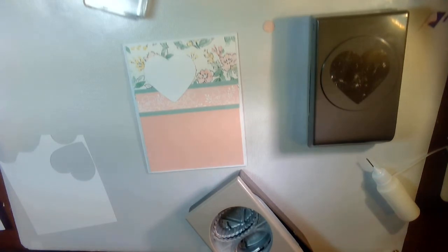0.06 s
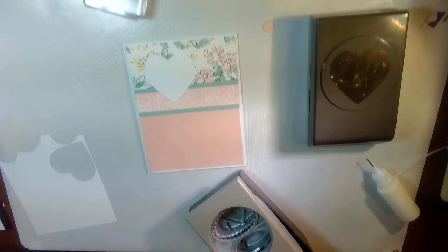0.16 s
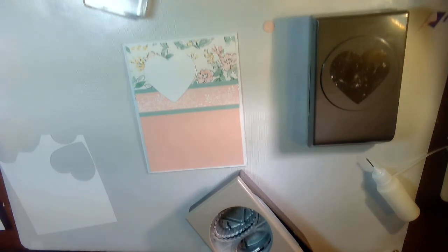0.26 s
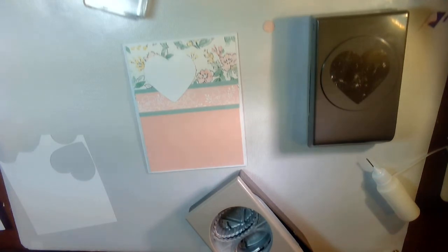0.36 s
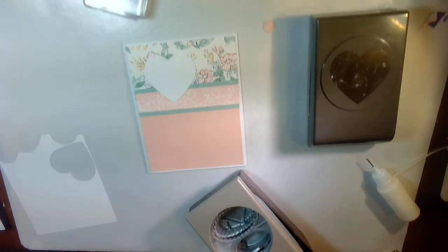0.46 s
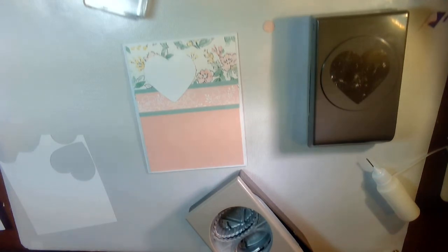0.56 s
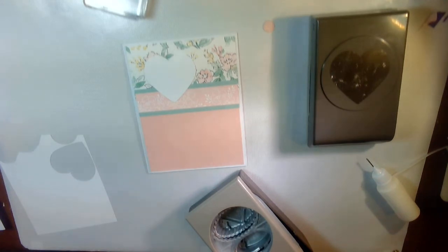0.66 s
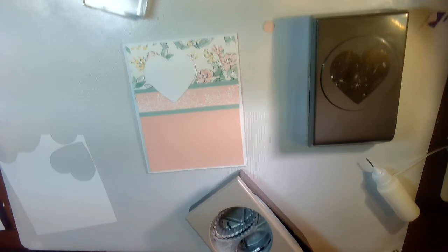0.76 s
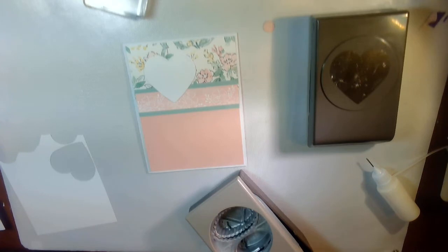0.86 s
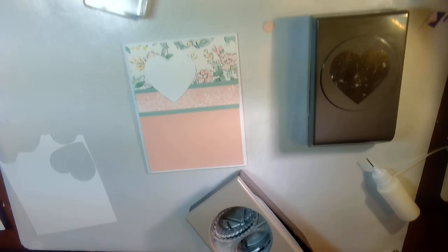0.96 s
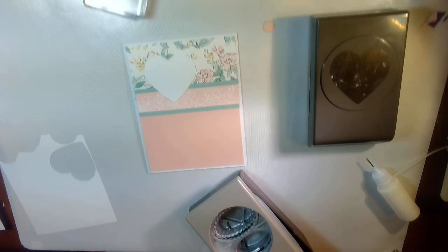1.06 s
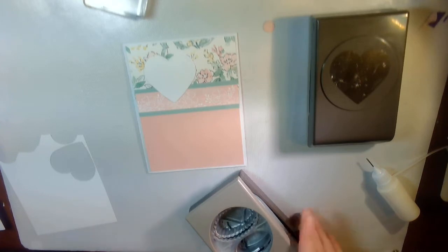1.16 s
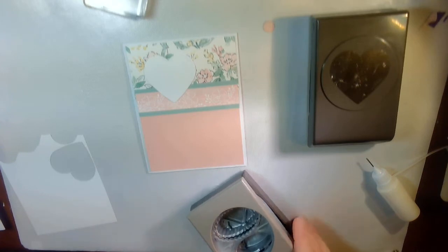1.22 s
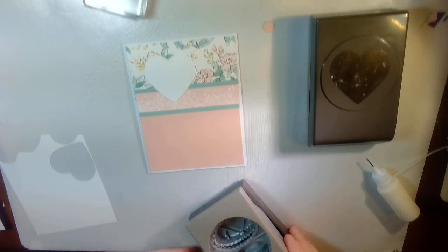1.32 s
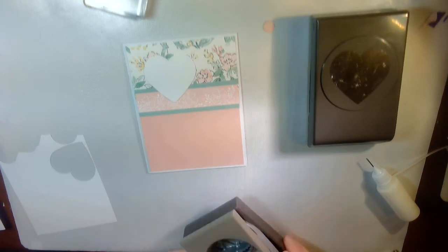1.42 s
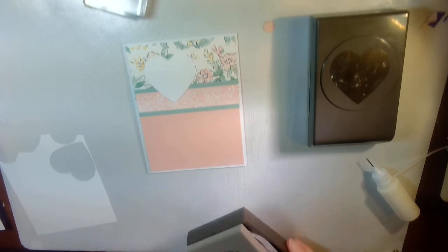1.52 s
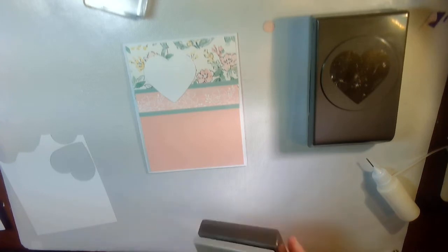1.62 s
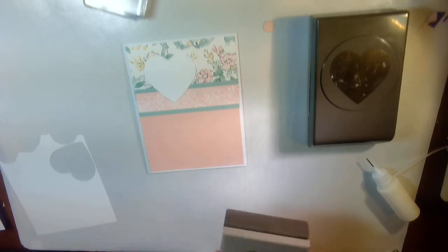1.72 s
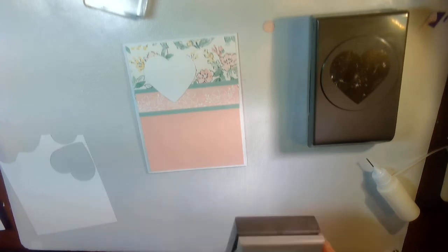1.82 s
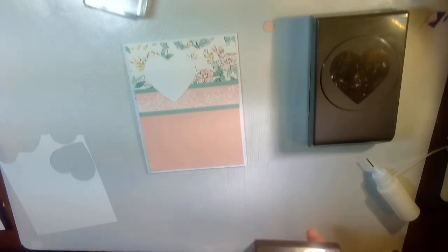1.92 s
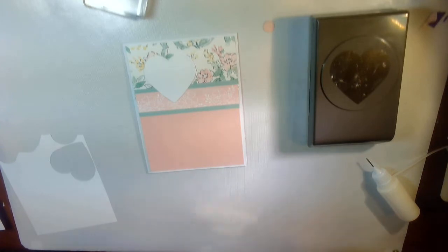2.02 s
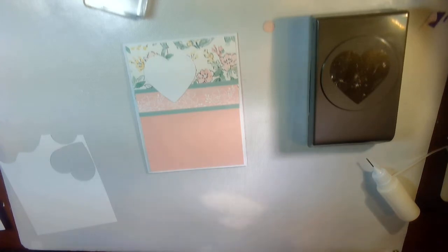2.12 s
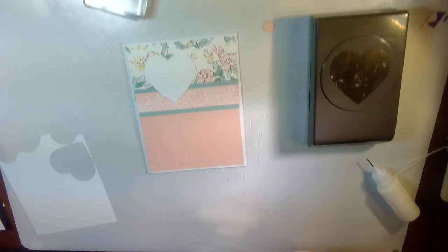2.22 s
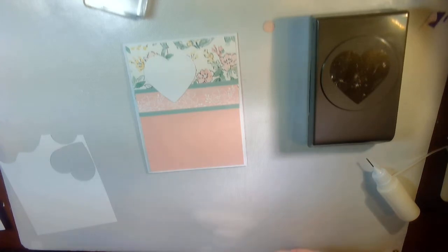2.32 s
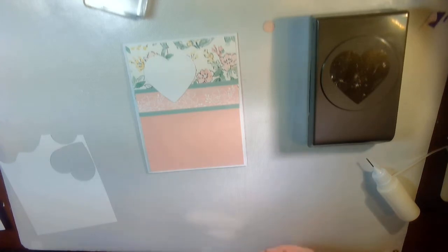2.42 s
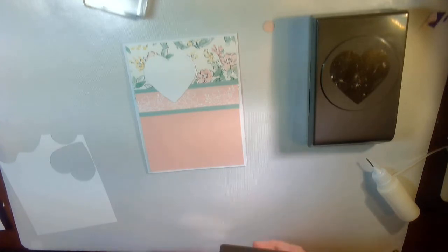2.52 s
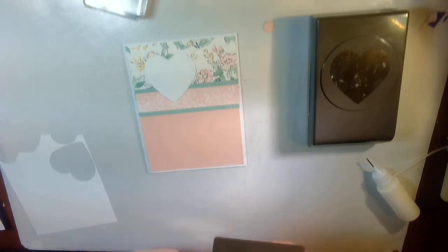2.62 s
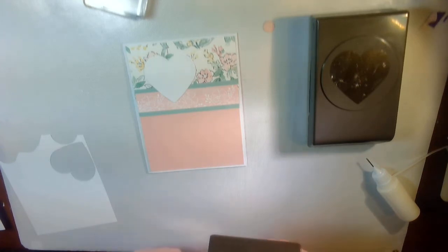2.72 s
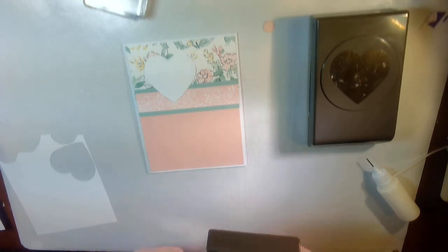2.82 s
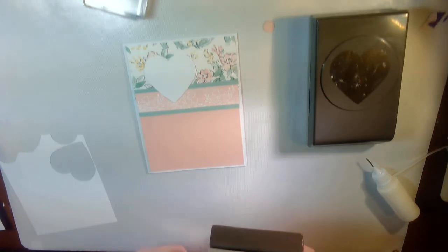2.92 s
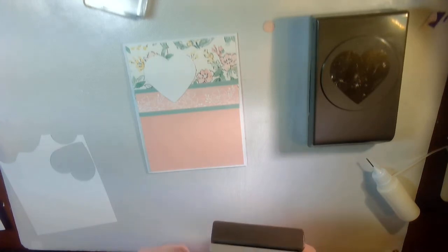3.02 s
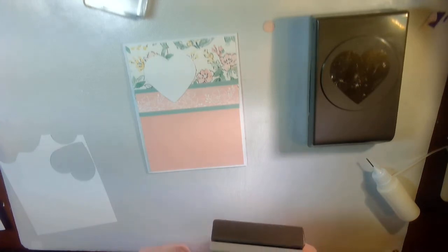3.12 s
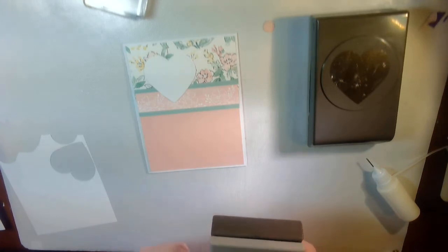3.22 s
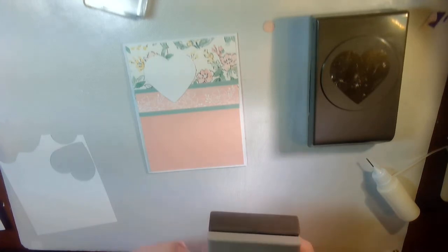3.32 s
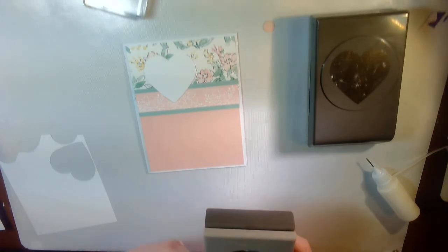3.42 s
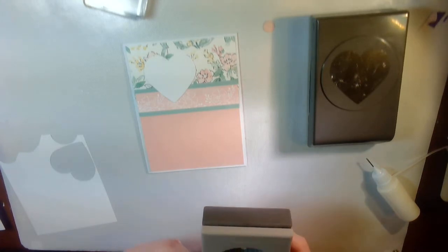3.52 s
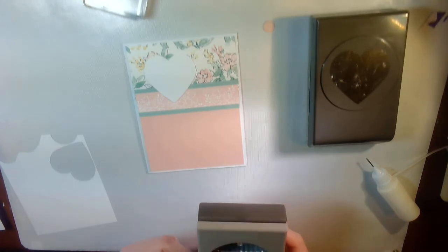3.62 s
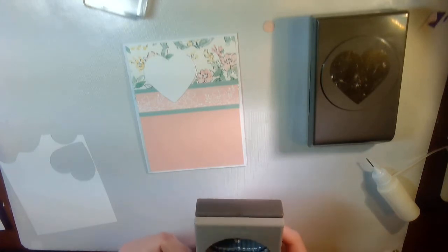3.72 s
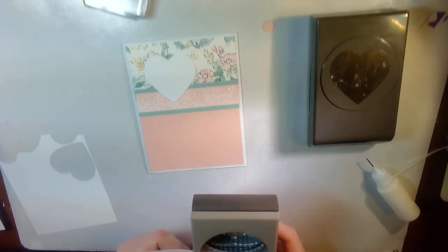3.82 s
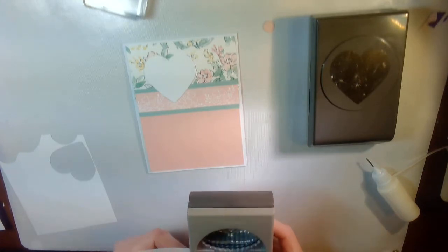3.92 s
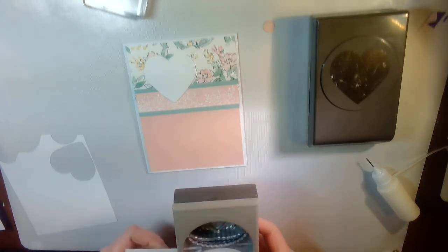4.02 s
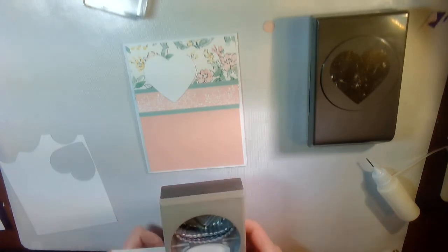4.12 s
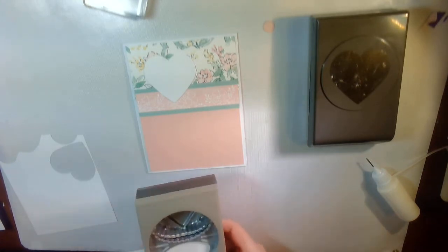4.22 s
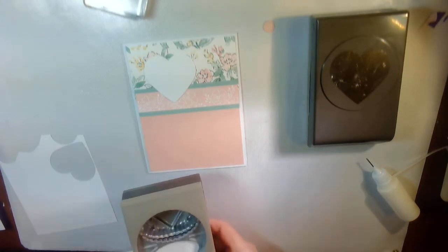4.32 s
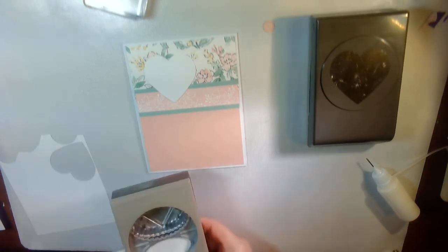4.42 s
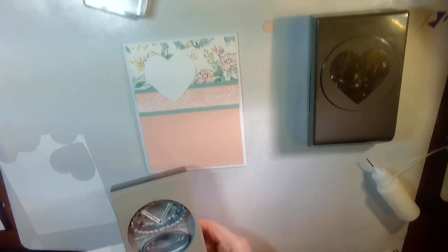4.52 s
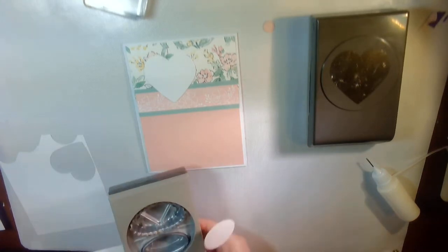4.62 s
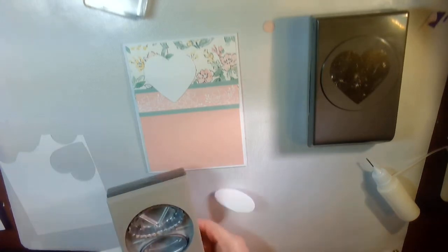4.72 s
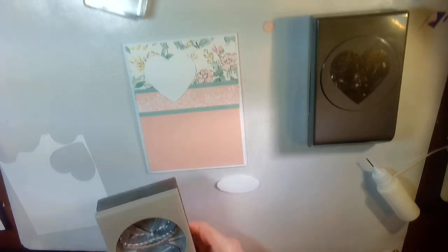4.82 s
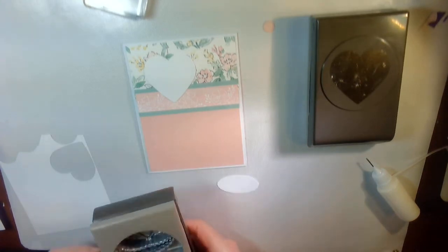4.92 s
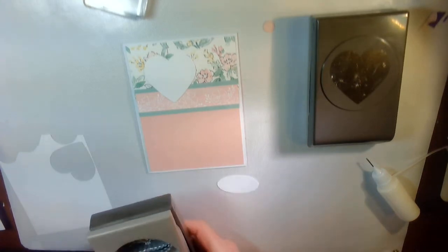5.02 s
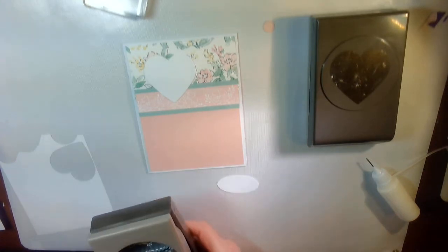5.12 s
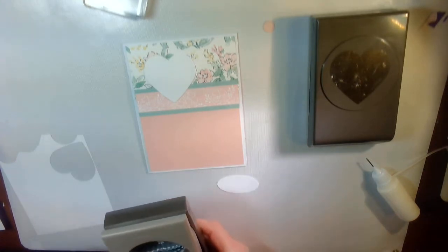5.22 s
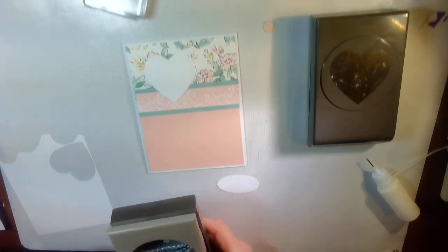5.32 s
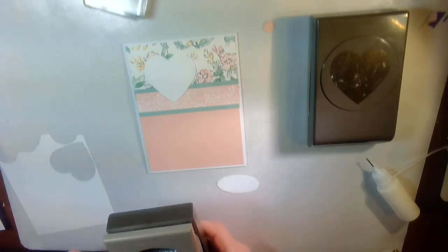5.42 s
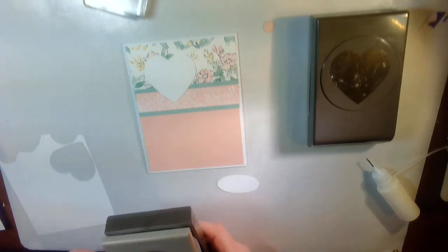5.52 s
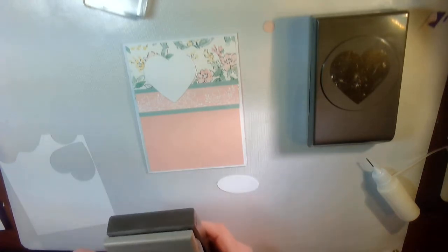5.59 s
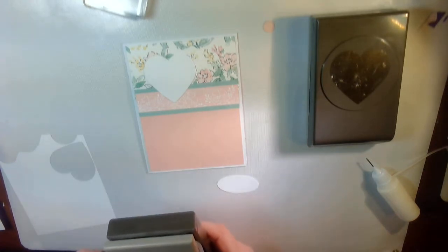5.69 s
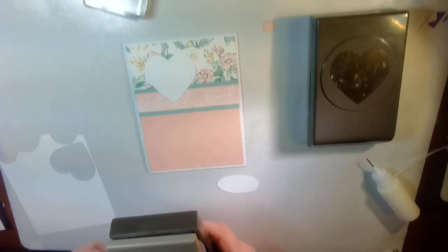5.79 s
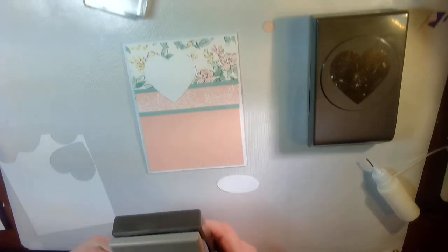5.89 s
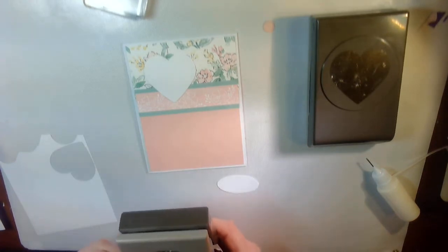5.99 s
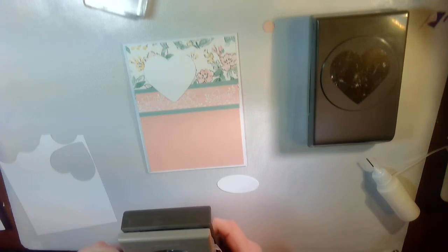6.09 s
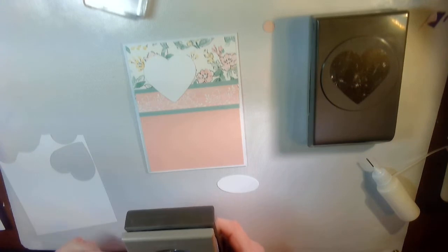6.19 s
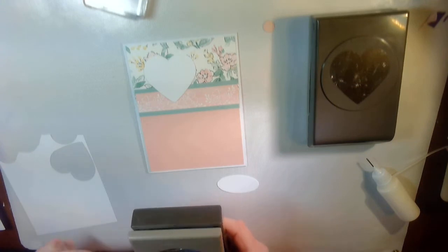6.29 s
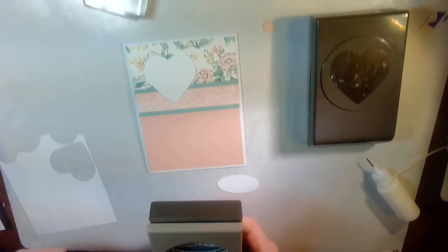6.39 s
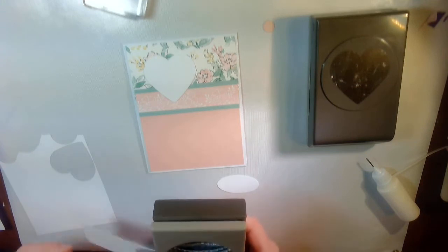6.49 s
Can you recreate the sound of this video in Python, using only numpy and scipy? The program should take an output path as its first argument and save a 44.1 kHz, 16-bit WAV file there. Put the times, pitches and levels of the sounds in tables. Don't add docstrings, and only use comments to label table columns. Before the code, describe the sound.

A small quiet room with faint hiss, low rumble and a barely audible thin whine, heard through a close, bright microphone. From 0 to 1 s paper sheets slide in short dry strokes, with crease snaps and soft pats. Around 1.2 to 1.5 s there are dull low thumps through the table and a sharp tick as the punch is lifted; small hollow clicks follow to 1.8 s. Bright hard ticks come at 2.2 s and a strong rustling snap at 2.5 s. From about 2.9 s it thins to sparse faint touches and small ticks. At 4.4 s the lever creaks, and near 4.5 s the die shears through in a loud, crunchy, overloaded double clack with a short metallic ring and table thud. At 4.75 to 4.9 s it springs back with clicks and paper rustles. Crisp scraping peaks at 5.4 s, eases, then crackles strongly at 6.2 to 6.4 s.

```python
import sys
import numpy as np
from scipy import signal
from scipy.fft import rfft, irfft, next_fast_len
from scipy.io import wavfile
from scipy.ndimage import uniform_filter1d

SR = 44100
rng = np.random.default_rng(int(sys.argv[2]) if len(sys.argv) > 2 else 0)


def file_out(sig):
    cols = np.atleast_2d(sig).T
    lim = np.clip(cols, -1, 1)
    pcm = np.round(lim * 32767).astype(np.int16)
    wavfile.write(sys.argv[1], SR, pcm)


def field_ratio(decibels):
    return 10 ** (np.asarray(decibels, dtype=float) / 20)


N = 288855
TIME = np.arange(N) / SR


def rms_one(x):
    return x / np.sqrt(np.mean(x ** 2) + 1e-20)


def band(x, low_hz, high_hz):
    edges = [low_hz, min(high_hz, 0.45 * SR)]
    return signal.sosfilt(signal.butter(2, edges, "band", fs=SR, output="sos"), x + 1e-18)


def resonate(x, hz, width_hz):
    r = np.exp(-np.pi * width_hz / SR)
    feed = (1 - r * r) / 2 * np.array([1, 0, -1])
    ring = [1, -2 * r * np.cos(2 * np.pi * hz / SR), r * r]
    return signal.lfilter(feed, ring, x + 1e-18)


def drift(rate_hz):
    r = np.exp(-2 * np.pi * rate_hz / SR)
    settle = 9999
    noise = rng.standard_normal(N + settle)
    return rms_one(signal.lfilter([1], [1, -2 * r, r * r], noise)[settle:])


def grains(per_s, spread_db):
    sizes = field_ratio(spread_db * np.minimum(rng.exponential(1, N), 4)) * rng.choice([-1, 1], N)
    return rms_one(sizes * (rng.random(N) < per_s / SR))


def swell(start, rise, hold, t60):
    first = int(start * SR)
    t = np.arange(min(int((rise + hold + t60) * SR), N - first)) / SR
    fade = field_ratio(-60 * np.maximum(t - rise - hold, 0) / t60)
    shape = np.minimum(t / max(rise, 1e-4), 1) ** 2 * fade
    return slice(first, first + len(t)), shape


def paper(core, body, flap, crisp):
    middle = band(band(core, 3800, 6620), 2950, 6240)
    low = 0.95 * band(body, 757, 2654)
    hollow = 1.11 * resonate(flap, 2770, 1100)
    top = band(crisp, 3730, 26000)
    bright = 0.41 * top + 0.65 * resonate(top, 5260, 1570)
    bright = bright + 0.44 * resonate(top, 5700, 2100) + 0.42 * resonate(top, 15200, 2700)
    return middle + low + hollow + bright


# f/Hz, level per Hz/dB
FLOOR = [(12, -16), (20, 3.5), (57, 0.5), (184, -10), (230, -10.5), (281, -11.5), (1020, -19.5),
         (3420, -24.5), (4660, -25.5), (6710, -28), (11800, -28), (12800, -33), (15200, -24.5),
         (16500, -49)]


def floor():
    hz = np.maximum(np.fft.rfftfreq(N, 1 / SR), 1)
    points = np.array(FLOOR)
    colour = field_ratio(np.interp(np.log(hz), np.log(points[:, 0]), points[:, 1]))
    hiss = rms_one(irfft(rfft(rng.standard_normal(N)) * colour, N))
    whine = rms_one(resonate(rng.standard_normal(N), 12800, 100))
    return field_ratio(-56.5) * hiss + field_ratio(-71) * whine


# t/s at the loudest point, friction level/dB, swell/s,
# fade/s, sheet body relative level/dB
SHUFFLES = [(.04, -47, 0.15, 0.36, -5.5), (.225, -36, 0.027, 0.24, -7.5), (.32, -36, 0.051, 0.096, -5),
            (.42, -38.5, 0.062, 0.2, -5), (.725, -44.5, 0.037, 0.097, -11),
            (.84, -41.5, 0.069, 0.094, -17.5), (.948, -38.5, 0.023, 0.11, -13),
            (1.013, -39.5, 0.023, 0.033, -9), (1.195, -51.5, 0.15, 0.22, -10),
            (1.425, -40, 0.19, 0.019, -13.5), (1.52, -47, 0.21, 0.24, -13.5),
            (1.64, -38.5, 0.064, 0.19, -15.5), (1.77, -39, 0.034, .1, -22), (2.1, -56.5, 1, 0.18, -16),
            (2.235, -41.5, 0.0099, 0.32, -15), (2.45, -38.5, 0.18, 0.27, -14),
            (2.535, -31.5, 0.023, 0.068, -12), (2.62, -41.5, 0.11, 0.27, -11.5),
            (2.77, -44, 0.24, 0.063, -8), (2.85, -50, .2, 0.55, -13), (3.08, -55.5, 0.35, 0.043, -7),
            (3.518, -51, 0.014, 0.065, -9), (3.975, -49.5, 0.033, .15, -8.5),
            (4.25, -56.5, 0.48, .08, -6.5),
            (4.77, -36.5, 0.034, 0.13, -8), (4.87, -33, 0.046, 0.081, -22),
            (4.911, -31.5, 0.051, 0.052, -15), (5.1, -47, 0.3, .08, -9), (5.25, -44.5, 0.28, 0.11, -12),
            (5.35, -34, 0.02, 0.18, -18), (5.41, -30.5, 0.066, 0.14, -27), (5.2, -41, 0.048, 0.04, -12.5),
            (5.49, -31.5, 0.21, 0.062, -21), (5.624, -39.5, 0.034, 0.12, -13),
            (6.038, -44.5, 0.27, .06, -16.5), (6.129, -40.5, .006, .15, -25),
            (6.223, -27.5, 0.079, 0.17, -26), (6.35, -30, 0.15, 0.059, -23),
            (6.451, -43, 0.015, 0.043, -12)]


def strokes():
    depth_db, roundness = 22.5, 1.116
    body_follows = 0.61
    idle_db, idle_body_db = -72, -77
    s, db, rise, fade, body = np.array(SHUFFLES).T[:, :, None]
    t = TIME[::32]
    loss = depth_db * (np.abs(t - s) / np.where(t < s, rise, fade)) ** roundness

    def total(each_db, rest_db):
        power = np.sum(field_ratio(each_db) ** 2, 0) + field_ratio(rest_db) ** 2
        return np.interp(TIME, t, 10 * np.log10(power))

    return total(db - loss, idle_db), total(db + body - body_follows * loss, idle_body_db)


# f/Hz, width/Hz, level/dB
SHEET_PATCHES = [(1485, 660, -2.5), (3550, 560, -0.5), (6240, 1140, -1), (8040, 1100, -4.5)]


def slide():
    level_db, body_db = strokes()
    crisp_db = 0.86 * level_db - 20.5
    flap_db = 0.41 * level_db + 0.63 * body_db + 0.5 + 2.62 * drift(43)

    moving = uniform_filter1d(1. * ((TIME < 4.36) | (TIME > 4.69)), size=600)
    clumps = moving * field_ratio(1.06 * drift(60) + 0.3 * drift(250))
    crackle = 0.32 * grains(350, 3.9)
    rub = clumps * (grains(7000, 4.8) + crackle)
    drag = clumps * (grains(4000, 1.9) + crackle)

    follows, pivot_db = 1.31, -35.5
    buckle_db = follows * (level_db - pivot_db) + pivot_db - 6.5
    buckles = 0
    for hz, width, db in SHEET_PATCHES:
        push = field_ratio(buckle_db + db + 5 * drift(10.1)) * drag
        buckles = buckles + resonate(resonate(push, hz, width), hz, width)

    core = field_ratio(level_db - 6.5 + 1.2 * drift(6.8)) * rub
    body = field_ratio(body_db + 4.5) * drag
    flap = field_ratio(flap_db) * rub
    patches = field_ratio(2.0 * drift(25))
    crisp = field_ratio(crisp_db + 2.5) * patches * rub
    return buckles + paper(core, body, flap, crisp)


# t/s, level/dB, f/Hz, rise and hold/s
KNOCKS = [(.05, -45, 380, .003), (1.162, -42, 150, .012), (1.165, -37, 38, .025), (1.21, -41, 130, .02),
          (1.27, -44, 35, .03), (1.33, -46, 150, .035), (1.37, -43, 40, .03), (1.41, -41, 155, .015),
          (1.435, -32, 138, .025), (1.44, -41, 50, .03), (1.48, -38, 125, .01), (4.44, -38, 60, .008),
          (4.476, -27, 38, .01), (4.485, -31, 380, .003), (4.48, -31, 80, .01), (4.505, -33, 120, .012),
          (4.508, -26, 240, .004), (4.54, -39, 50, .02), (4.62, -44, 45, .04), (4.88, -48, 450, .003)]


def table():
    out = np.zeros(N)
    for s, db, hz, rise in KNOCKS:
        at, shape = swell(s, rise, rise, 1.4 / np.sqrt(hz))
        out[at] += field_ratio(db) * shape * np.sin(2 * np.pi * hz * np.arange(len(shape)) / SR)
    return out


# t/s, peak level/dB, decay/s
TICKS = [(1.2083, -19.5, .013), (1.4105, -9, 0.008), (2.2215, -11.5, 0.0064), (2.2457, -4.5, 0.0055),
         (2.369, -21, .021), (2.2257, -19, 0.0045), (2.2389, -15, 0.0047), (2.257, -14, 0.0061),
         (3.157, -29, 0.011), (3.5134, -35, 0.036), (4.035, -26.5, 0.0092), (4.759, -11, 0.0072),
         (5.343, -29, 0.071), (5.388, -16, .02), (5.396, -11, 0.022), (5.474, -17.5, 0.041),
         (5.7544, -30.5, 0.01), (5.949, -33, .013), (6.2717, -9, 0.012), (6.3404, -10, 0.042),
         (6.361, -14, 0.0066), (6.4495, -22, 0.054)]
# t/s, peak level/dB, decay/s
SNAPS = [(.0967, -34, .012), (0.307, -16.5, 0.029), (0.3474, -17, .0083), (0.7172, -22.5, 0.041),
         (0.869, -24, .018), (0.921, -26.5, 0.021), (0.9495, -11.5, 0.016), (0.976, -28, 0.028),
         (1.0118, -14, 0.027), (1.015, -21, 0.0061), (0.7287, -28, 0.015), (2.274, -24, 0.01),
         (2.451, -17.5, 0.0084), (2.5309, -9.5, 0.047), (3.3356, -40.5, 0.026), (4.738, -12, 0.0057),
         (4.9083, -13, 0.039), (5.1011, -22, 0.02), (5.409, -16.5, 0.047), (6.2268, -9, 0.074),
         (6.2826, -20, .019), (6.3472, -14.5, 0.063), (6.3794, -12.5, 0.015), (6.4862, -31, 0.046)]
# t/s, peak level/dB, decay/s
FLAPS = [(1.198, -28.5, 0.018), (1.2376, -43, 0.016), (1.3727, -32.5, .014), (1.4225, -19.5, 0.0089),
         (1.6206, -51, 0.039), (1.6657, -24, 0.025), (1.787, -41, .025), (1.8014, -32, 0.034),
         (1.8174, -33, 0.022), (1.9586, -41, 0.018), (2.2306, -22, 0.01), (2.325, -38, 0.056),
         (3.709, -48.5, .021), (3.9723, -40.5, 0.08), (4.7097, -31, 0.016), (4.776, -26.5, 0.014),
         (4.8738, -25.5, 0.05), (5.985, -53, .02)]
# t/s, peak level/dB, decay/s
PATS = [(0.055, -26, 0.021), (0.131, -25.5, 0.011), (0.156, -33.5, 0.064), (0.315, -22, .045),
        (0.531, -31, 0.023), (1.1694, -22.5, 0.0062), (1.644, -28.5, 0.049), (2.1054, -34.5, 0.075),
        (2.226, -25, 0.066), (2.596, -26, 0.074), (2.688, -33.5, 0.082), (5.623, -38.5, 0.051),
        (6.129, -37, 0.018), (6.1664, -37, 0.033), (6.265, -15, 0.019)]
# middle level/dB, body level/dB, flap level/dB, crisp level/dB
KINDS = [(0, -19, -53, -9), (0, -1, -11.5, -6), (0, -75, 17, -33), (3, 8, -9.5, -6)]


def creases():
    spray, whisper = grains(15000, 0.74), grains(15000, 4.5)
    lanes = np.zeros((4, N))
    for rows, kind_db in zip([TICKS, SNAPS, FLAPS, PATS], KINDS):
        colour = field_ratio(kind_db)[:, None]
        for s, peak_db, decay in rows:
            at, shape = swell(s - 0.04 * decay, 0.0003 + 0.07 * decay, 0, np.clip(decay, 0.002, 0.06))
            burst = shape * spray[at]
            even = np.sqrt(np.sum(shape ** 2) / np.sum(burst ** 2))
            lanes[:, at] += colour * field_ratio(peak_db - 14.5) * burst * even

            at, shape = swell(s - 0.004, 0.0065, 0, 1.35 * max(decay, 0.002))
            lanes[:, at] += colour * field_ratio(peak_db - 22.0) * shape * whisper[at]
    return paper(*lanes)


# t/s, level/dB, f/Hz, hold/s
RUBS = [(0.214, -60, 222, 0.31), (0.203, -54.5, 372, 0.27), (0.295, -47, 570, 0.053),
        (0.948, -38.5, 2240, 0.0026), (3.522, -59, 2440, 0.019), (1.164, -48, 270, 0.047),
        (1.323, -52.5, 144, 0.15), (1.394, -52.5, 300, 0.053), (1.409, -54.5, 470, 0.082),
        (1.667, -32, 3110, 0.0035), (1.743, -50, 3130, 0.041), (1.815, -45, 3120, 0.0062),
        (1.749, -51, 5380, 0.066), (1.787, -39.5, 3260, 0.024), (1.799, -48.5, 1800, 0.026),
        (2.233, -42, 865, 0.011), (2.224, -52.5, 515, .02), (2.238, -49.5, 1370, 0.022),
        (2.53, -49, 2180, 0.0056), (0.527, -50, 7660, .006), (1.59, -59, 3120, 0.14),
        (4.476, -10, 2150, .011), (4.534, -38, 790, .055), (4.527, -34.5, 1180, 0.055),
        (4.54, -44.5, 166, 0.034), (5.473, -55, 1630, .055), (5.992, -53, 3280, 0.051),
        (6.355, -46.5, 1005, 0.018)]


def rubs():
    rough, out = grains(6000, 3.3), np.zeros(N)
    for s, db, hz, hold in RUBS:
        width = 70 + 0.13 * hz
        at, shape = swell(s, 0.002, hold, 1.7 / np.sqrt(hz))
        note = rms_one(resonate(resonate(rough[at], hz, width), hz, width))
        out[at] += field_ratio(db) * shape * note
    return out


# t/s, force level/dB, rise/s, hold/s, hardness level/dB
BITES = [(4.39, -33.5, 0.01, 0.013, -12), (4.413, -37, 0.0055, 0.023, -27),
         (4.435, -16.5, 0.0096, 0.0033, -12), (4.447, -10.5, 0.0026, 0.00023, -11),
         (4.448, -32.5, 0.0015, 0.014, -23), (4.4758, -1, 0.0052, 0.011, -28.5),
         (4.494, -8.5, 0.0018, 0.013, -16), (4.5008, -3.5, 0.00062, .0022, -16.5),
         (4.507, 3.5, 0.00025, 0.0025, -8), (4.51, -2, 0.0012, 0.0042, -6),
         (4.517, -5.5, 0.0016, 0.0043, -12), (4.5235, -14.5, 0.0011, 0.0039, -15),
         (4.527, -16, .002, 0.01, -23), (4.538, -37.5, 0.0019, 0.017, -32)]
# f/Hz, width/Hz, level/dB
DIE = [(2150, 590, 1), (1290, 560, -4), (642.6, 440, -13), (2410, 510, -5)]
# f/Hz, width/Hz, level/dB
LEVER = [(3760, 770, -12), (2960, 350, -3.5), (6560, 840, -17)]
# f/Hz, level/dB, time to fall 60 dB/s
HOUSING = [(646, -8, .07), (790, -8.5, 0.053), (1251, 5, .067), (1760, -6, 0.15), (2423, 0, .05),
           (3790, -11, 0.044), (4177, -10, 0.023), (5190, -13, 0.026)]


def punch():
    tear, force = grains(12000, 2.4), np.zeros((2, N))
    for s, force_db, rise, hold, hard_db in BITES:
        at, shape = swell(s, rise, hold, 0.0081)
        force[:, at] += field_ratio([[force_db], [force_db + hard_db]]) * shape
    push, hard = force * tear

    def bank(rows, gain_db):
        return sum(field_ratio(db + gain_db) * resonate(push, hz, width) * (-1) ** k
                   for k, (hz, width, db) in enumerate(rows))

    die, arm = bank(DIE, 6.0), bank(LEVER, 7.0)
    housing = 0
    for hz, db, t60 in HOUSING:
        housing = housing + field_ratio(db + 4.5) * resonate(push, hz, np.log(1000) / np.pi / t60)
    shear = field_ratio(-9.5) * band(push, 4280, 5340) + field_ratio(-7.0) * band(hard, 260, 23000)
    return die + arm + housing + shear


def room(x):
    t60_s, wall_cut_hz = 0.28, 6600
    size = next_fast_len(N + SR)
    w = 2 * np.pi * np.arange(size // 2 + 1) / size
    dull = 1 / (1 + 1j * w * SR / (2 * np.pi * wall_cut_hz)) ** 0.33
    total = 0
    for k, lag in enumerate(rng.uniform(0.006, 0.025, 10)):
        trip = field_ratio(-60 * lag / t60_s) * dull * np.exp(-1j * w * lag * SR)
        total = total + (-1) ** k * trip / (1 - trip)
    return irfft(rfft(x, size) * total, size)[:N]


def scene():
    near = slide() + creases() + rubs() + punch()
    return (near + field_ratio(-26) * room(near) + table())[None]


def roll_off(x):
    return signal.sosfilt(signal.butter(12, 17000, fs=SR, output="sos"), x)


def record(dry):
    coloured = dry + field_ratio(13.5) * resonate(dry, 4633, 688)
    ceiling = 0.58
    clipped = coloured / (1 + np.abs(coloured / ceiling) ** 4) ** (1 / 4)
    low_pass = signal.ellip(10, 0.5, 70, 15750, fs=SR, output="sos")
    mix = signal.sosfilt(low_pass, clipped + floor())
    return roll_off(mix)


dry = scene()
out = record(dry)
file_out(out)
```